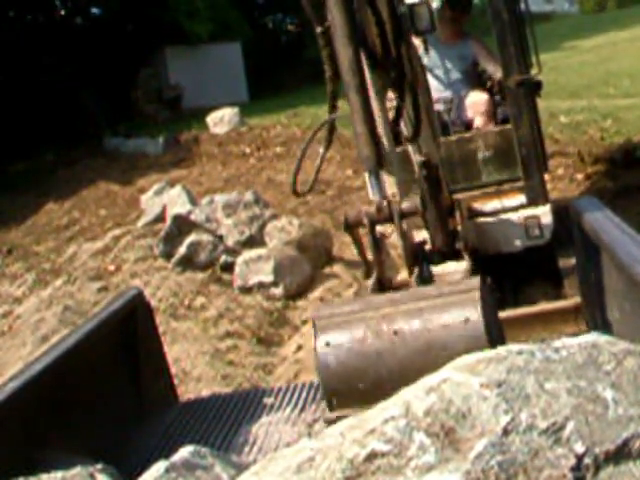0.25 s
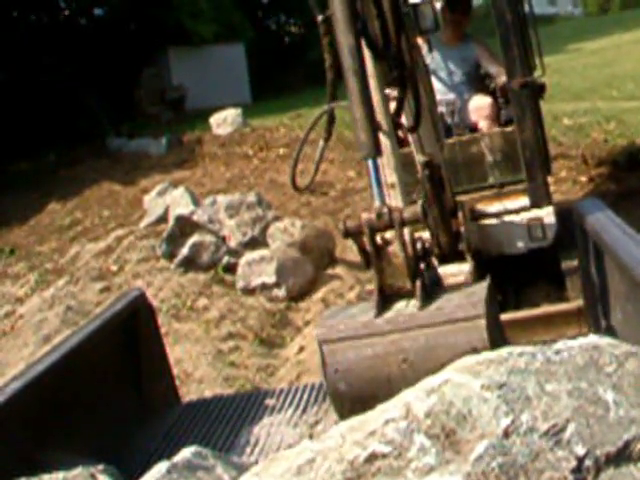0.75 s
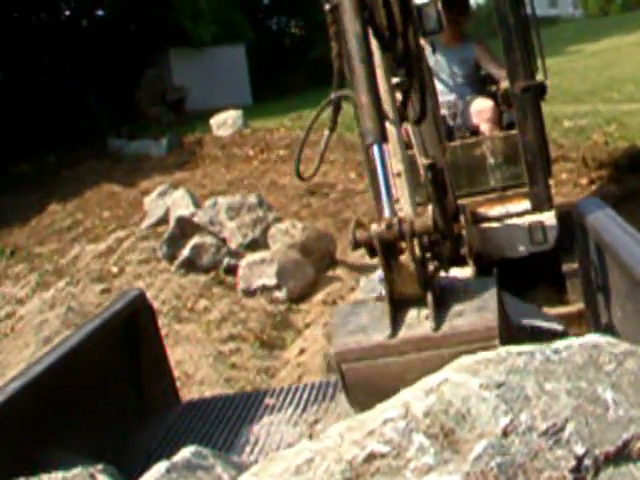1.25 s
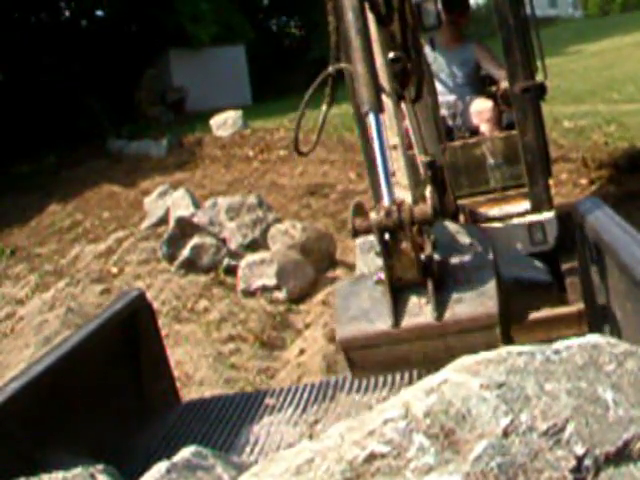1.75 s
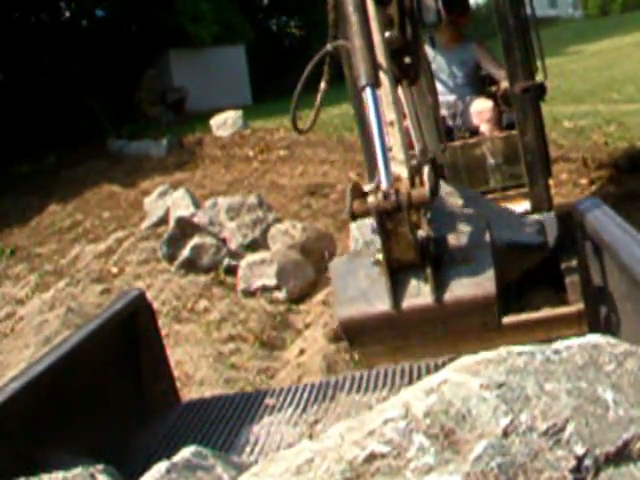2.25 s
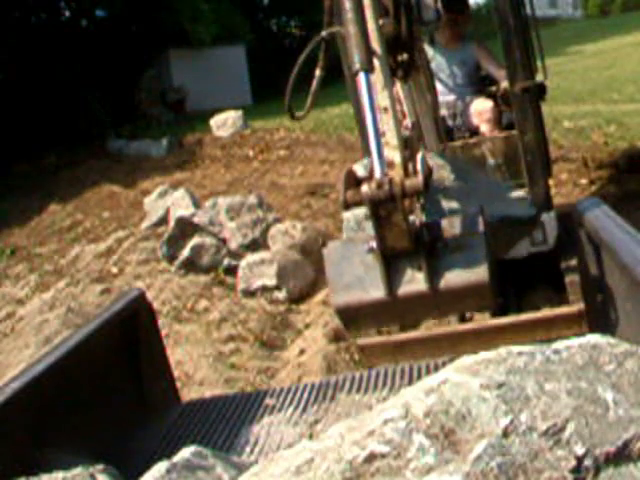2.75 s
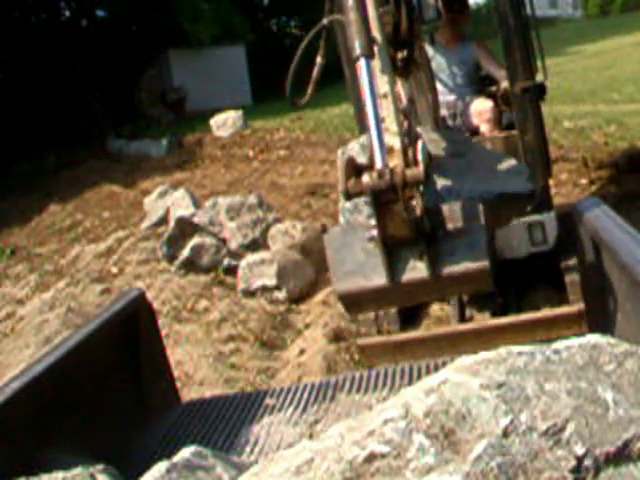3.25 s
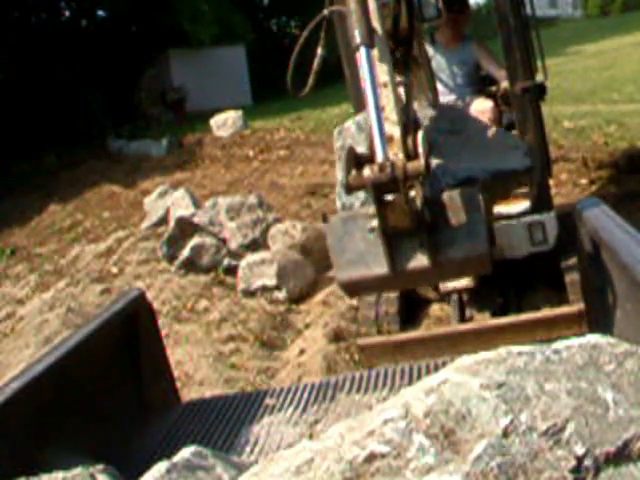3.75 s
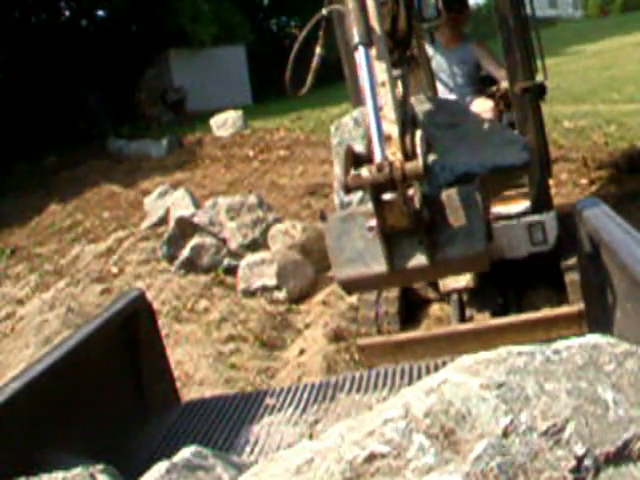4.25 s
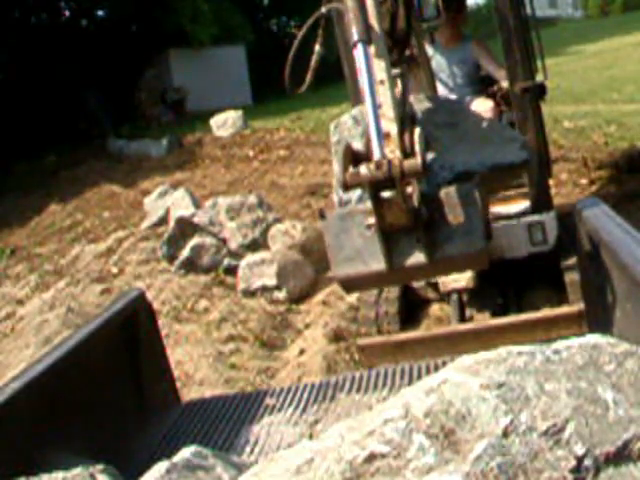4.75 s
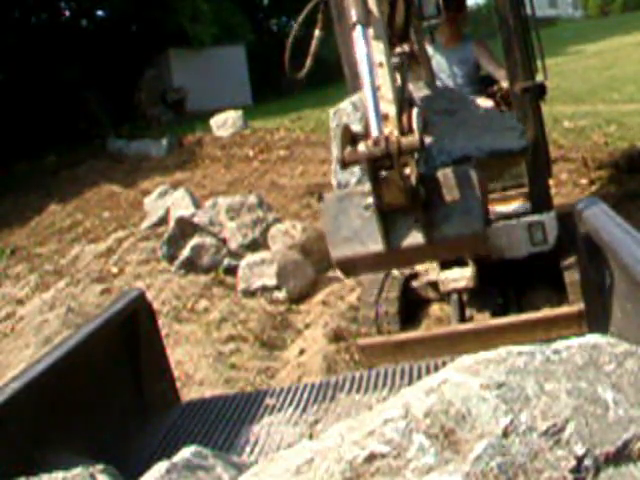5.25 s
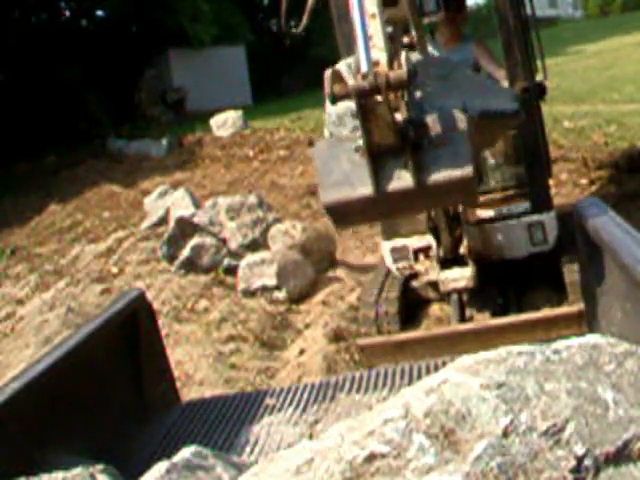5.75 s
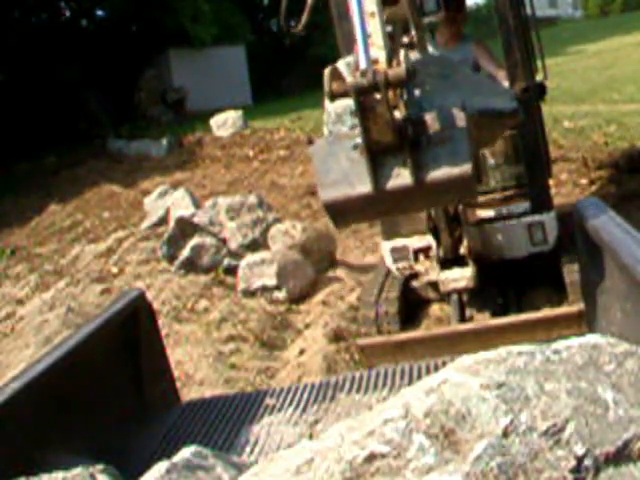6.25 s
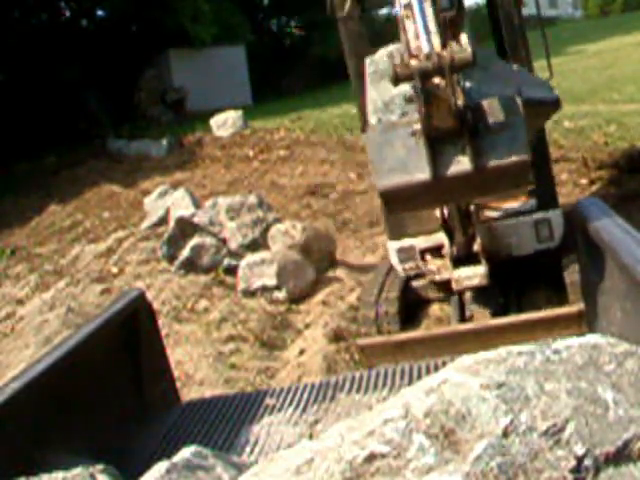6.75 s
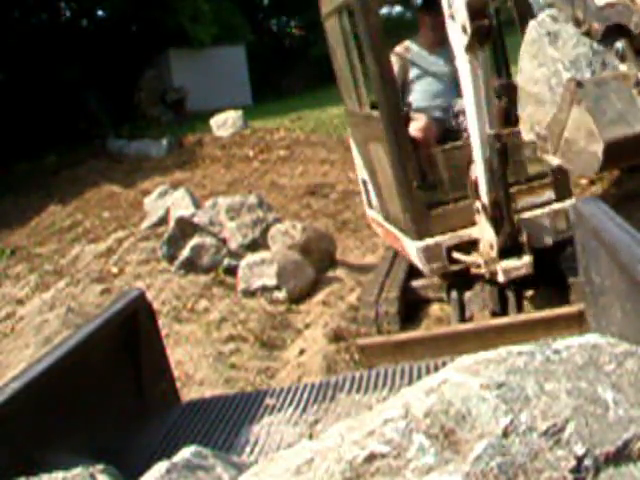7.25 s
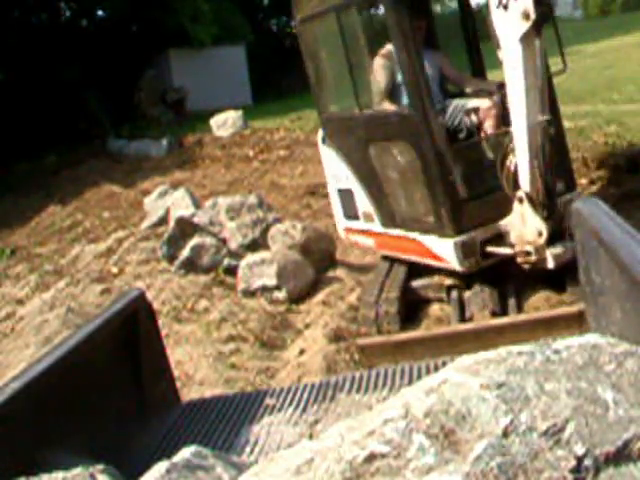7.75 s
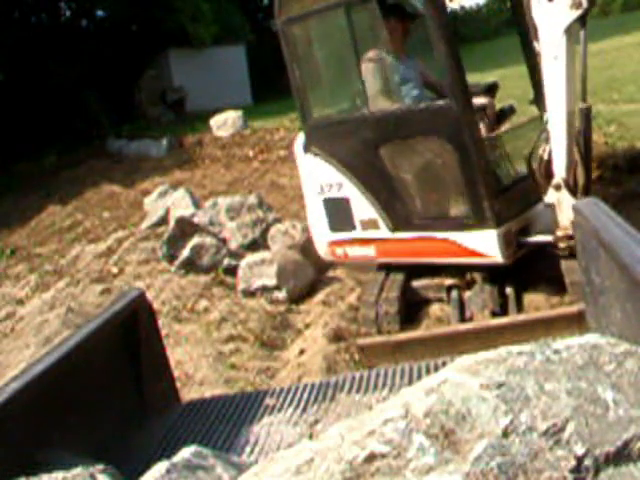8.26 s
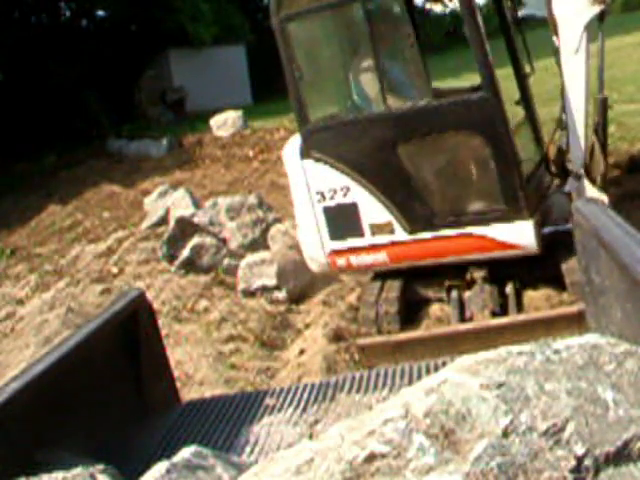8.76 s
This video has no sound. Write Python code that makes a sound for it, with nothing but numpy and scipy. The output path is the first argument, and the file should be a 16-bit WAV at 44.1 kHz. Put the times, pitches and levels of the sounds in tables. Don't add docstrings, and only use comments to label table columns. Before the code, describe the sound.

Outdoors, a few metres from a small camera microphone, a mini excavator's diesel drones. Rocks knock and scrape in its steel bucket, then one loud bang makes the whole sound duck. Smaller knocks follow as the engine creeps back, sagging in pitch with rising hydraulic whine. A sharp clack, pitch jumps up, the machine runs freely, then the cab turns with gear tones and more clatter.

```python
import sys
import numpy as np
from scipy import signal
from scipy.fft import rfft, irfft
from scipy.io import wavfile
from scipy.ndimage import uniform_filter1d

SR = 44100
rng = np.random.default_rng(int(sys.argv[2]) if len(sys.argv) > 2 else 0)


def wav_out(sig):
    wavfile.write(sys.argv[1], SR, np.round(np.clip(np.atleast_2d(sig).T, -1, 1) * 32767).astype(np.int16))


def nominal_scale(level):
    x = np.asarray(level, float) / 20
    return 10 ** x


N = 397782
T = np.arange(N) / SR

BANG_S = 0.3337
RELIEF_S = 4.06
# start_s, end_s
TURN_S = (6.876, 7.83)


def columns(table):
    s, *values = np.vstack(table).T
    return [np.interp(T, s, v) for v in values]


def unit(x):
    return x / np.sqrt(np.mean(x ** 2))


def colour(x, points):
    hz, db = np.transpose(points)
    grid_hz = np.maximum(np.fft.rfftfreq(8192, 1 / SR), 1)
    log_gain = np.interp(np.log(grid_hz), np.log(hz), db, right=-80) * np.log(10) / 20
    cepstrum = irfft(log_gain)
    cepstrum[1:4096] *= 2
    cepstrum[4097:] = 0
    return signal.fftconvolve(x, irfft(np.exp(rfft(cepstrum))))[:len(x)]


def walk(rate_hz):
    hold = int(SR / rate_hz)
    steps = np.repeat(rng.standard_normal(N // 100), hold)[:N]
    return unit(uniform_filter1d(uniform_filter1d(steps, hold), hold))


def tones(turns, orders, lead_db, waver_hz=14):
    out = 0
    for multiple, db, waver_db in orders:
        phase = 2 * np.pi * (multiple * turns + 0.2 + 0.1 * rng.random())
        phase = phase + 0.08 * waver_db * walk(waver_hz)
        out = out + nominal_scale(lead_db + db + waver_db * walk(waver_hz)) * np.sin(phase)
    return np.sqrt(2) * out


def together(*dbs):
    return 10 * np.log10(sum(nominal_scale(2 * db) for db in dbs))


def swing():
    # start_s, gear_hz, gear_db, motor_hz, motor_db
    cab = [
        (6.9, 455, -58.5, 350, -68),
        (7.4, 457, -35, 358.7, -60),
        (7.8, 458.6, -34, 352, -51),
        (8.1, 458, -36.5, 354.3, -48),
        (8.4, 458.4, -35.5, 361, -32),
        (8.7, 450, -37.5, 357, -41),
        (9.02, 449, -45.5, 348, -28),
    ]
    gear_hz, gear_db, motor_hz, motor_db = columns(cab)
    gear = tones(np.cumsum(gear_hz) / SR, [(1, 0.087, 2.3)], gear_db)
    motor = tones(np.cumsum(motor_hz) / SR, [(1, 0.087, 2.3)], motor_db)
    return gear + motor


def fan(turns, blade_db, lower_db, drone_db):
    # firing_multiple, level_db, waver_db
    beside = [(10 / 3, -17.5, 4.3), (11 / 3, -28, 1.2), (4.836, -24, 4.4)]
    # start_s, end_s, slip_turns
    turn_slip = (7.0, 8.0, .65)
    valve_slip = 0.37 * np.clip((T - RELIEF_S) / 0.15, 0, 1)
    slip = 0.5 + valve_slip + np.interp(T, turn_slip[:2], (0, turn_slip[2]))
    drone = tones(turns + slip / 4.031, [(4.031, 0, 0.8)], drone_db, 30)
    drone = drone + tones(turns, beside, drone_db)
    blade = tones(turns, [(2.418, 0, 1.5)], blade_db, 18)
    lower = tones(turns, [(1.612, 0, 0.7)], lower_db)
    return drone + blade + lower


def valve():
    # start_s, centre_hz, level_db
    glide = [
        (2.2, 6640, -80),
        (2.5, 6420, -50),
        (2.9, 6205, -50.5),
        (3.4, 5900, -52),
        (4.1, 6000, -49),
        (4.4, 5977, -71),
    ]
    centre_hz, level_db = columns(glide)
    breadth = unit(uniform_filter1d(rng.standard_normal(N), size=60))
    return nominal_scale(level_db) * breadth * np.sin(2 * np.pi * np.cumsum(centre_hz) / SR)


def hydraulics(turns, ripple_db, overtone_db, hiss_db):
    # firing_multiple, level_db, waver_db
    overtones = [(5, -7.5, 1.2), (7, -10.5, 0.81), (10, -18.5, 2.4), (11, -27, 2.0), (12, -26.5, 2.0),
                 (15, -15, 1.4)]
    # freq_hz, db_per_hz
    oil = [(1530, -24), (2600, 0), (2890, -11.5), (3280, -0.5), (5320, -2.5), (6020, -3.5), (7010, -7),
           (7800, -10.5), (9290, -22.5), (10000, -33.5), (13000, -63), (22000, -120)]
    relief_db = -13
    relieved = np.clip((T - RELIEF_S) / 0.03, 0, 1)
    dropout = relieved * np.clip(RELIEF_S + 1.6 - T, 0, 1)
    whine = tones(turns, [(4, 0, 0.6)], ripple_db, 30)
    whine += tones(turns, overtones, overtone_db + 0.5 + relief_db * relieved, waver_hz=1.8)
    whine += tones(turns, [(8, 0, 0.5)], overtone_db + relief_db * dropout)
    pulse = 3.5 + np.exp(-(turns % 1) / 0.3)
    hiss = unit(colour(pulse * rng.standard_normal(N), oil))
    return whine + valve() + nominal_scale(hiss_db + 0.68 + 0.5 * walk(12)) * hiss


def firings(turns, scatter_db):
    count = turns.astype(int)
    burn_db = scatter_db * rng.standard_normal(count[-1] + 1)
    cylinder_db = np.array([1.5, 0, -1.5])
    return nominal_scale(burn_db[count] + cylinder_db[count % 3])


def exhaust(turns, firing_db, octave_db, third_db, sixth_db, rumble_db):
    # firing_multiple, level_db, waver_db
    beside = [(4 / 3, -20.5, 1.5), (7 / 3, -19, 4.8), (5, -25.5, 2)]
    # freq_hz, db_per_hz
    boom_spectrum = [(25, -39), (60, -12), (90, -12), (115, -4), (150, -3), (180, 0), (215, -8.5),
                     (300, -32)]
    # freq_hz, db_per_hz
    rumble_spectrum = [(170, -33.5), (230, -3), (280, -3), (400, -4.5), (560, -11.5), (750, -17),
                       (1200, -27)]
    orders = tones(turns, [(1, 0, 0.3)], firing_db) + tones(turns, [(2, 0, 0.7)], octave_db)
    orders += tones(turns, [(3, -1, 1)], third_db) + tones(turns, [(6, -1, 1)], sixth_db)
    orders += tones(turns, beside, firing_db)
    puff = 1 + firings(turns, 1.2) * np.exp(-(turns % 1) / 0.3)
    boom = unit(colour(puff * rng.standard_normal(N), boom_spectrum))
    boom *= nominal_scale(0.52 * firing_db + 0.47 * rumble_db - 1.0)
    rumble = unit(colour(puff * rng.standard_normal(N), rumble_spectrum))
    rumble *= nominal_scale(rumble_db + 3.0 + 0.36 * walk(6.6))
    return orders + boom + rumble


def block(turns, clatter_db):
    # freq_hz, db_per_hz
    front_spectrum = [(320, -34), (550, -7), (628, 0), (686, -7.5), (744, -2.5), (956, -5), (1040, -8),
                      (1330, -9), (1440, -13), (2130, -12.5), (2890, -22.5), (3200, -21.5), (4160, -49),
                      (7040, -120)]
    # freq_hz, db_per_hz
    tail_spectrum = [(320, -28), (550, 0), (637, -2), (686, -5), (813, -5), (942, 1), (1270, -8.5),
                     (1370, -5), (2070, -10.5), (2330, -7.5), (2820, -20), (3200, -17), (4160, -39.5),
                     (7040, -120)]
    rap = 3 + firings(turns, 2) * np.exp(-(turns % 1) / 0.3)
    front = unit(colour(rap * rng.standard_normal(N), front_spectrum))
    tail = unit(colour(rap * rng.standard_normal(N), tail_spectrum))
    turned = np.interp(T, TURN_S, (0, 1))
    heard = np.sqrt(1 - turned) * front + np.sqrt(turned) * nominal_scale(0.89 * walk(12)) * tail
    return nominal_scale(clatter_db + 1.0 + 0.5 * walk(6.8)) * heard


def ring(t, hz, db, t60_s):
    return nominal_scale(db - 60 * t / t60_s) * np.sin(2 * np.pi * hz * t)


def hump(hz, skirt_db):
    return [(hz / 3, -24), (hz / 1.43, -7), (hz, 0), (hz * 1.28, -7), (hz * 1.94, skirt_db), (hz * 9, -40)]


def lump(t, hz, t60_s):
    neighbours_hz = hz * np.exp(0.27 * rng.standard_normal(size=2))
    return ring(t, hz, 0, t60_s) + sum(ring(t, near_hz, -1.1, 0.9 * t60_s) for near_hz in neighbours_hz)


def knock(t, peak_db, thud_hz, crack_db, crack_hz, t60_s):
    # freq_hz, db_per_hz
    crack_spectrum = [(1500, -22.5), (2500, 8.5), (4500, 6), (6500, 3.5), (8500, -13.5), (10500, -45)]
    grit = rng.standard_normal((3, len(t)))
    fall = nominal_scale(-60 * t / t60_s) * (1 + 0.3 * np.exp(-t / 0.0054))
    ringing = min(900 / thud_hz, 1) ** 2
    thud = fall * unit(colour(grit[0], hump(thud_hz, -17.0))) + ringing * lump(t, thud_hz, t60_s)
    grind = 1.11 * unit(colour(grit[1], hump(crack_hz, -31.5)))
    crack = fall * (grind + unit(colour(grit[2], crack_spectrum)))
    attack = np.minimum(t / 0.00028, 1)
    return nominal_scale(peak_db - 8.0) * attack * (thud + nominal_scale(crack_db - 5.0) * crack)


def rocks():
    # start_s, peak_db, thud_hz, crack_over_thud_db, crack_hz
    knocks = [(0.0322, -10.5, 564, -13, 2370), (0.0606, -14, 686, 3, 2050), (0.063, -16, 1300, -8, 5500),
              (0.124, -12.5, 700, -8, 3000), (.146, -13, 597, -14, 1900), (0.276, -25, 2400, 4, 4200),
              (0.3342, -2.8, 981, -4.5, 5050), (.352, -17, 2140, -13, 4900),
              (0.393, -24.5, 2000, 9.5, 6400), (.419, -21.5, 767, -2, 3020), (0.4454, -27, 1570, 9, 3340),
              (0.4679, -15, 377, -15, 1000), (0.4768, -13.5, 1400, 5, 5270),
              (0.533, -32.5, 1497, 5.5, 6100), (0.5943, -29, 1390, 0, 4350), (1.0173, -43, 1990, 6, 5500),
              (1.0475, -21.5, 520, -10.5, 2480), (1.254, -31.5, 1465, -12, 4000),
              (1.5768, -30.5, 1228, -6, 3395), (1.648, -36.5, 2130, 1.5, 5900),
              (1.8148, -25.5, 1400, -2, 5470), (1.84, -33, 1790, -4, 5010), (3.017, -25, 697, -14, 3000),
              (3.848, -17, 1534, 2.5, 5900)]
    # start_s, peak_db, thud_hz, crack_over_thud_db, crack_hz
    slides = [
        (.195, -24, 870, -4, 4500),
        (.235, -30, 1620, 3.5, 4500),
        (0.6482, -39, 2470, 6, 5000),
        (.860, -29.5, 389, -4.5, 2480),
        (0.9113, -37.5, 2000, -0.5, 6000),
        (1.275, -33.5, 2100, -4, 5500),
        (1.583, -29.5, 392, -28, 3020),
        (1.262, -32, 710, -9, 2000),
        (7.601, -23, 1210, -12, 2995),
    ]
    # freq_hz, level_db, t60_s
    modes = [(323, -28, 0.12), (713, -13, 0.24), (805, -10.5, 0.26), (861, 1.5, 0.11), (1240, -29, 0.19),
             (2316, -12, 0.3), (2509, -26, 0.45), (3564, -21, 0.64), (5394, -22, 0.53), (5800, -30, 0.88)]
    # start_s, freq_hz, level_db, t60_s, stopped_by_rock_s
    late_ring = (.485, 577, -26.5, .85, .68)
    out = np.zeros(N + SR)
    t = T[:SR // 2]
    hits = [(*row, 0.1) for row in knocks] + [(*row, 0.22) for row in slides]
    for start_s, *settings in hits:
        i = int(start_s * SR)
        out[i:i + len(t)] += knock(t, *settings)
    bang = int(BANG_S * SR)
    build_up = np.minimum(t / 0.019, 1)
    out[bang:bang + len(t)] += nominal_scale(-12) * build_up * sum(ring(t, *mode) for mode in modes)
    echo_s, echo_db = 0.019, -17.5
    lag = int(echo_s * SR)
    out[lag:] += nominal_scale(echo_db) * out[:-lag]
    start_s, hz, db, t60_s, stop_s = late_ring
    swell = np.clip(np.minimum(t / 0.0051, (stop_s - start_s - t) / 0.031 + 1), 0, 1)
    out[int(start_s * SR):][:len(t)] += swell * ring(t, hz, db, t60_s)
    return out[:N]


def levels(firing_hz):
    layers = {"firing": (-22, 1.04, 0, -1.2, 1), "octave": (-27.5, 1.2, 10, -2.5, 1.5),
              "third": (-39, .8, -3.5, 1.2, 4.5), "sixth": (-36.5, 1.5, -11.5, -1, 2.9),
              "rumble": (-33, 0.75, 1.5, 1.5, -0.5), "clatter": (-34.5, 0.53, 1.5, 6.5, 0.35),
              "drone": (-20.5, 1, -11, 0.8, -0.2), "ripple": (-36.5, 0.64, 2.5, 4.5, 2.5),
              "overtone": (-43, 0.8, 14.5, 1, 0.8), "hiss": (-44.5, 0.33, 0.8, 0, 0.5),
              "blade": (-28.5, 0.82, -2.5, -0.2, 2.1), "lower": (-30.5, 1.7, 4.5, -1.5, 0.5)}
    # start_s, firing_db, drone_db, third_db, blade_db
    shading = [
        (6.8, -0.5, 0, 0, -0.5),
        (7.08, 0.8, 4, -2, -2.5),
        (7.35, -2, -2, -4, 5.5),
        (7.54, -2.5, -3.5, 9, 0.5),
        (7.75, -3.5, -10, 8.5, 4.5),
        (8.07, -8.5, -1.5, 16.5, 8.5),
        (8.36, -4, 5.5, 6, 3),
        (8.8, -4, 3, -5, 2),
        (9.02, -3.5, 3, -3, 3),
    ]
    rubble = {"rumble": (-29.5, -27, -51), "clatter": (-33, -16.5, -30.5), "hiss": (-45, -22, -42.5)}
    duck_db, duck_s, recovered_s, recovery_curve = -28.5, 0.019, 4.216, 1.295
    free_hz, sag_hz = 80.2, 6.7
    burst_db_per_s, tumble_s, settle_db_per_s = 287, 0.16, 142
    since = T - BANG_S
    back = np.clip(since / (recovered_s - BANG_S), 0, 1) ** recovery_curve
    duck = duck_db * np.clip(since / duck_s, 0, 1) * (1 - back)
    load = np.clip((free_hz - firing_hz) / sag_hz, 0, 1)
    turned = np.interp(T, TURN_S, (0, 1))
    db = {}
    for name, (run_db, share, load_db, turn_db, wander_db) in layers.items():
        db[name] = run_db + share * duck + load_db * load + turn_db * turned + wander_db * walk(6)
    for name, shade_db in zip(("firing", "drone", "third", "blade"), columns(shading)):
        db[name] = db[name] + shade_db
    db["drone"] = db["drone"] - 2 * (since < 0)
    db["hiss"] = db["hiss"] + 3.8 * np.maximum(T - 6.57, 0)
    for name, (scrape_db, burst_db, tumble_db) in rubble.items():
        burst = burst_db - burst_db_per_s * abs(since)
        tumble = tumble_db - settle_db_per_s * np.maximum(since - tumble_s, 0)
        loose = np.where(since < 0, scrape_db, together(burst, tumble))
        db[name] = together(db[name], loose)
    return db


def scene():
    # start_s, firing_hz
    shaft = [(0, 80.63), (.33, 81.03), (.75, 78.97), (1.45, 77.8), (2.3, 74.83), (3.3, 73.08),
             (4.06, 73.73), (4.27, 81.94), (4.7, 81.7), (4.95, 80.3), (5.7, 80.25), (6.4, 81.04),
             (6.9, 79.57), (7.15, 79.7), (7.58, 81.6), (8.0, 80.07), (8.32, 81.8), (9.02, 80.3)]
    beat_null_s = 3.06
    firing_hz, = columns(shaft)
    turns = np.cumsum(firing_hz) / SR
    from_null = turns - np.round(np.interp(beat_null_s, T, turns))
    db = levels(firing_hz)
    machine = swing() + fan(from_null, db["blade"], db["lower"], db["drone"])
    machine += hydraulics(from_null, db["ripple"], db["overtone"], db["hiss"])
    machine += exhaust(turns, db["firing"], db["octave"], db["third"], db["sixth"], db["rumble"])
    machine += block(turns, db["clatter"])
    return (machine + rocks())[None]


def low_pass(x):
    return signal.sosfilt(signal.butter(12, 15750, fs=SR, output="sos"), x)


def record(dry):
    bass_cut_hz, top_hz, overload = 45, 10100, 0.7
    self_noise_db, grain_db = -94.5, -59
    x = signal.sosfilt(signal.butter(2, bass_cut_hz, "high", fs=SR, output="sos"), dry)
    x = signal.sosfilt(signal.cheby1(8, 1, top_hz, fs=SR, output="sos"), x)
    x = np.clip(x, -overload, overload)
    running = np.sqrt(uniform_filter1d(x ** 2, size=8000) + nominal_scale(2 * self_noise_db - 2 * grain_db))
    x = x + nominal_scale(grain_db) * running * rng.standard_normal(x.shape)
    return low_pass(x)


dry = scene()
out = record(dry)
wav_out(out)
```